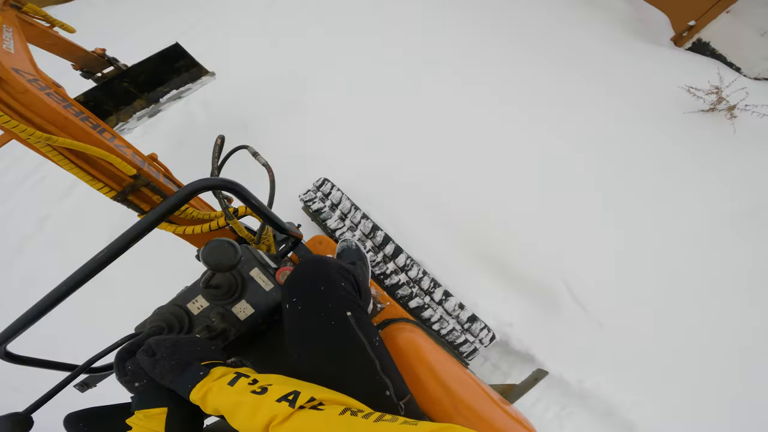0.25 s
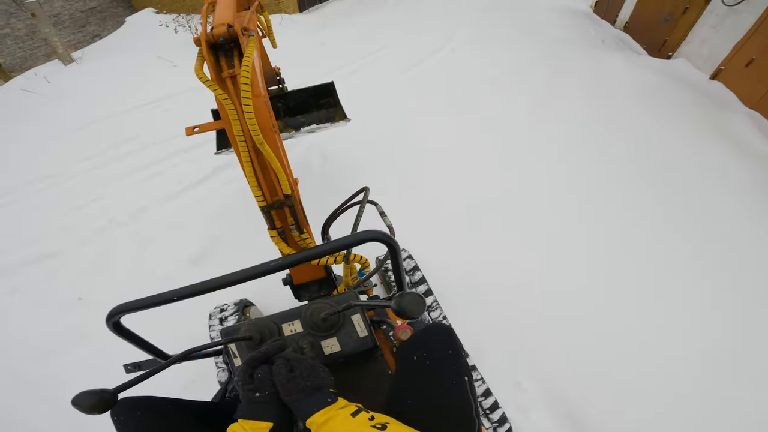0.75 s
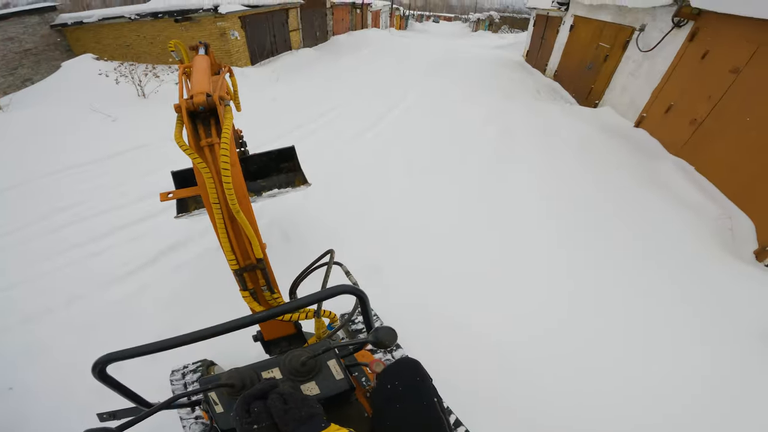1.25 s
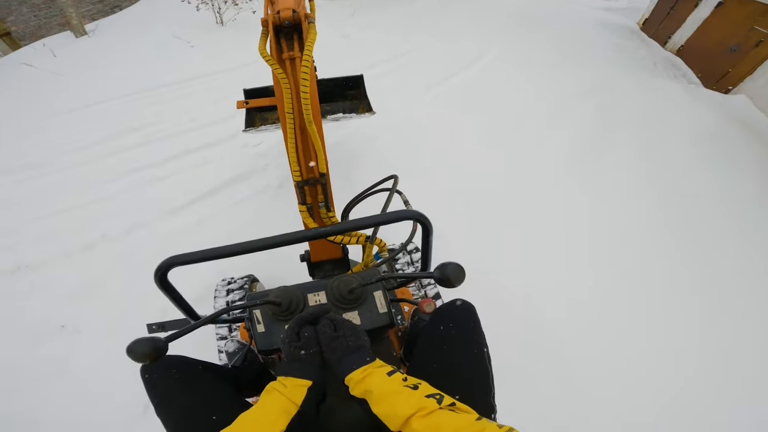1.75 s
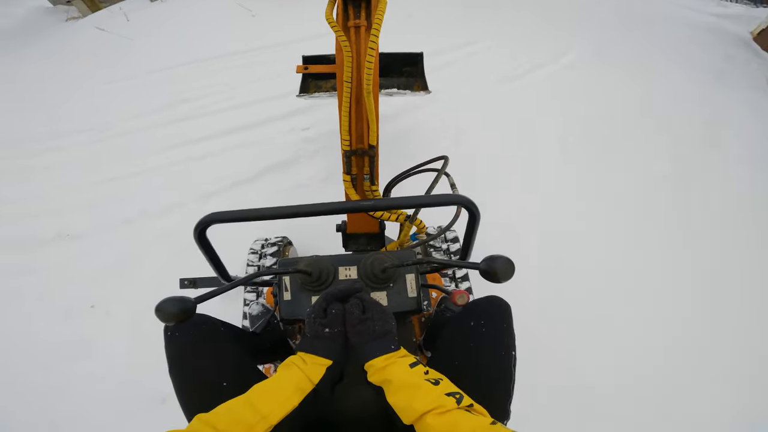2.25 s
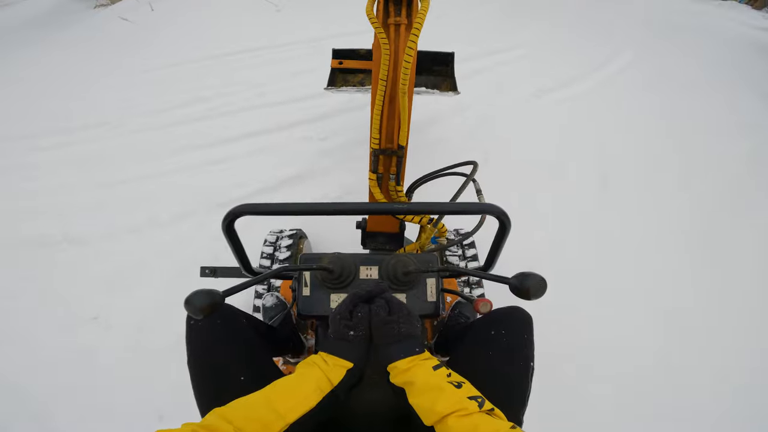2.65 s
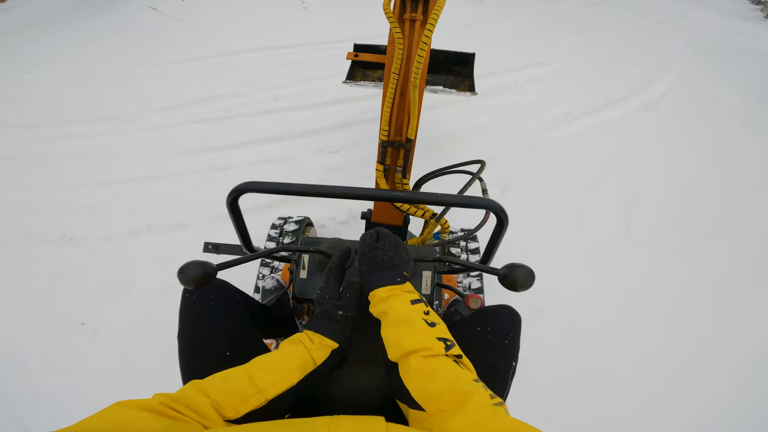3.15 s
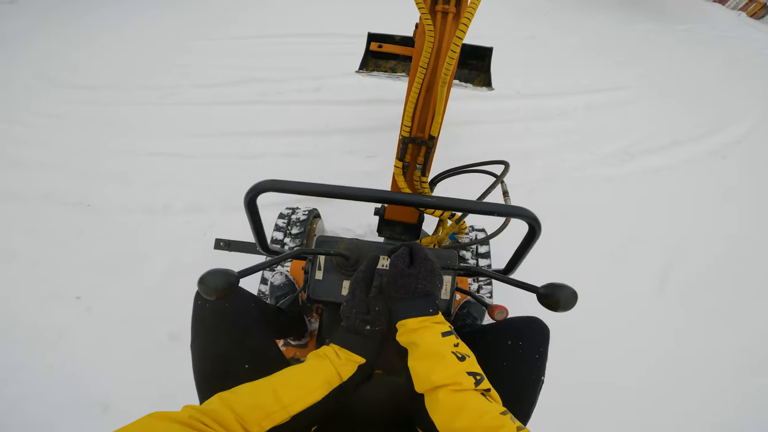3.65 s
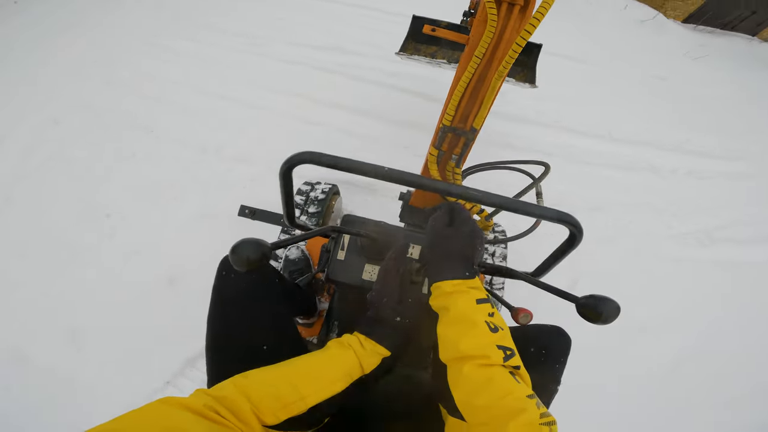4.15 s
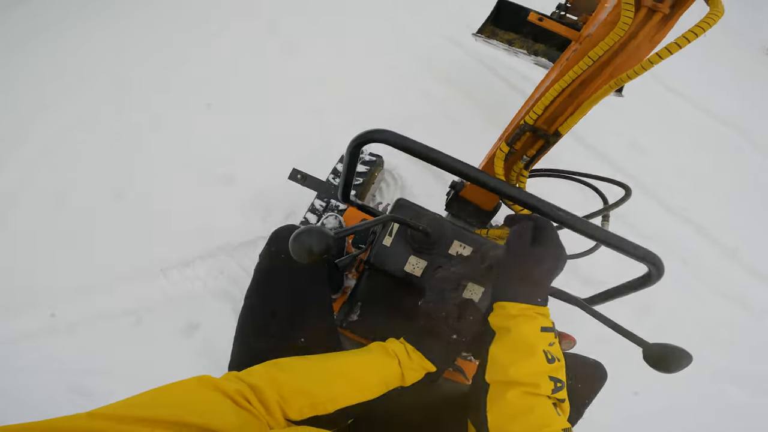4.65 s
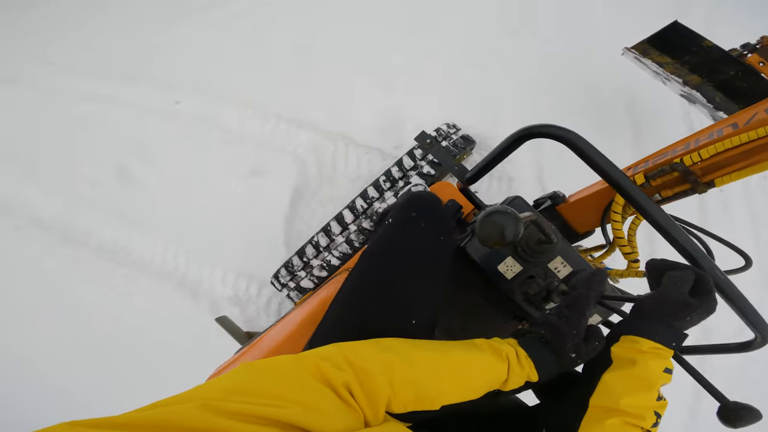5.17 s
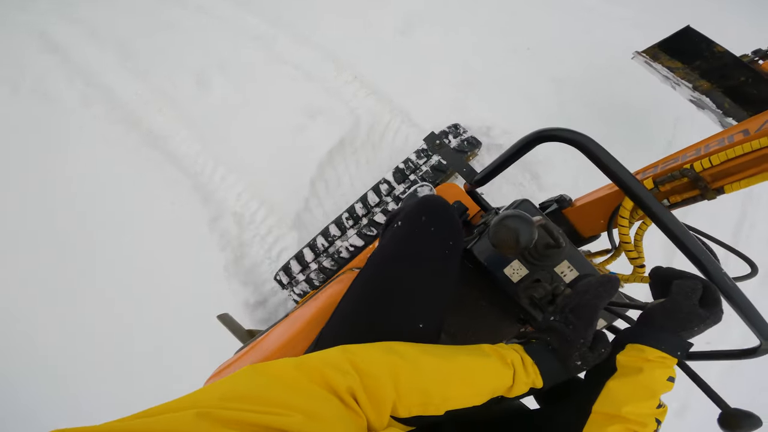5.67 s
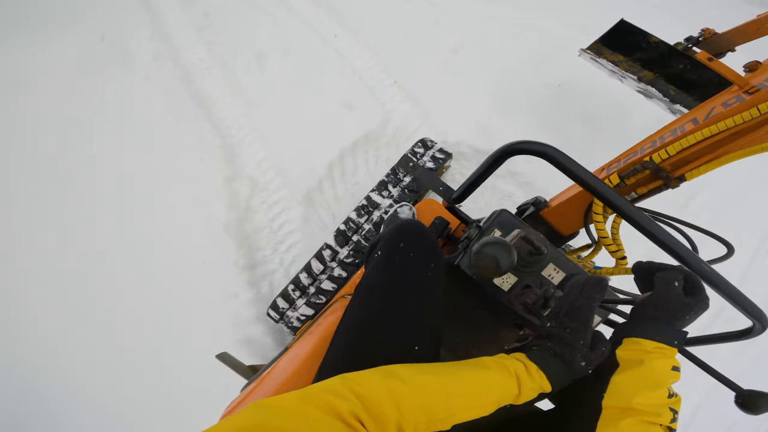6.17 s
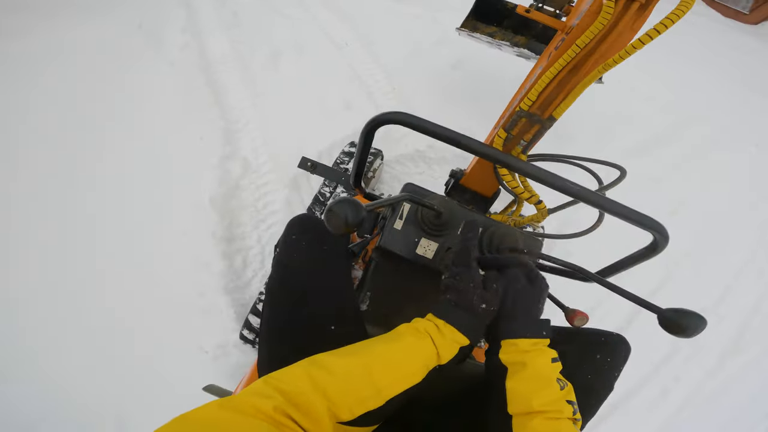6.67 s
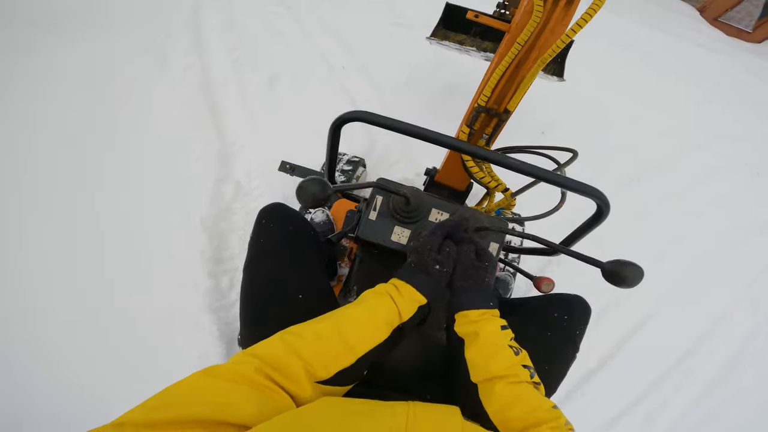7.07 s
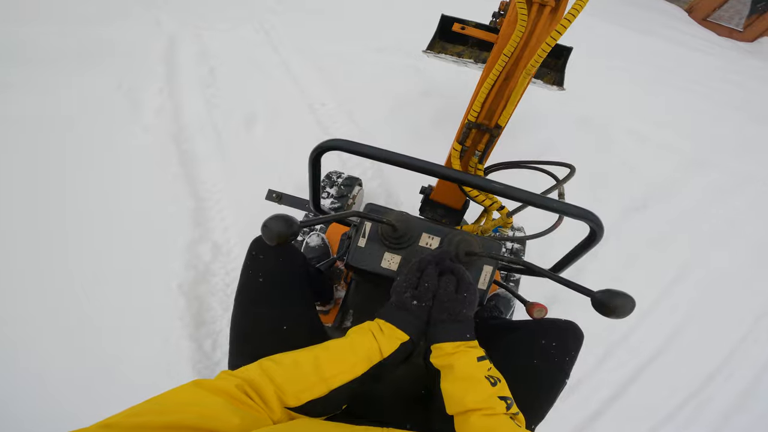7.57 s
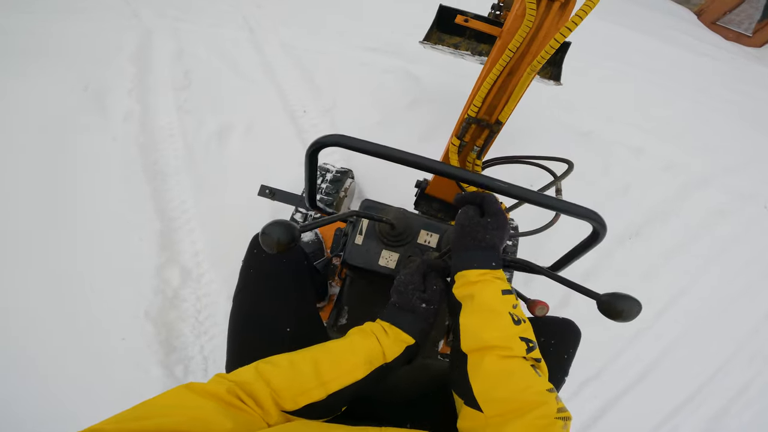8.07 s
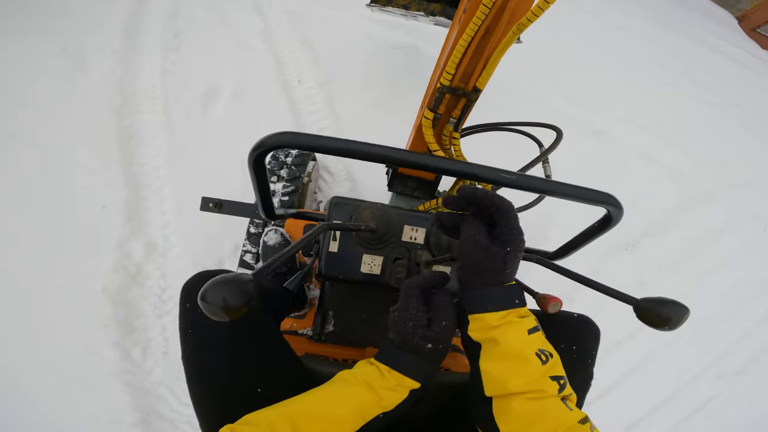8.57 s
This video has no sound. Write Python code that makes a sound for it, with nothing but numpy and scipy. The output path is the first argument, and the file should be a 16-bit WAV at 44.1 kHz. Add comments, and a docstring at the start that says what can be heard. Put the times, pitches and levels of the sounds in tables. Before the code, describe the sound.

Close, dry, open-air sound from a head-worn stereo microphone above a compact excavator. The diesel putters at about twenty-one beats a second, with ringing knock and broadband mechanical rustle. Pump whine and oil hiss fade early, followed by crisp clicks and a few duller clunks, busiest around two seconds and after seven. Between roughly five and seven seconds the engine colour changes, with sparser ticks; the pump rises slightly at the end.

```python
"""A one-cylinder diesel digger crawls over snow, heard by a camera on the driver's head.
Throughout, groups of engine overtones pulse once a cycle, the cylinder knocks and the casing rustles.
At first a pump whines and a valve hisses, fading over a second; levers and track links start to tick and clunk.
A soft swish passes at 3.25 s. From about 4.7 to 7 s the head is turned well aside, which shifts the colour.
Ticks and clunks go on, and the pump comes up again a little from about 8 s."""
import sys
import numpy as np
from scipy import signal
from scipy.fft import rfft, irfft
from scipy.io import wavfile
from scipy.ndimage import uniform_filter1d

SR = 44100
rng = np.random.default_rng(int(sys.argv[2]) if len(sys.argv) > 2 else 0)


def master(y):
    """Save y as 16-bit WAV."""
    cut = np.clip(np.atleast_2d(y).T, -1, 1)
    pcm = np.round(cut * 32767)  # scale
    wavfile.write(sys.argv[1], SR, pcm.astype(np.int16))


N = 388962
T = np.arange(N) / SR


def undb(db):
    """Turn decibels into a plain gain."""
    return np.exp(np.asarray(db) * np.log(10) / 20)


def level(x, db):
    """Scale to an rms level."""
    return x * undb(db) / np.sqrt(np.mean(x ** 2))


def curves(table):
    """Columns of a time table, one value a sample."""
    s, *columns = np.transpose(table)
    return [np.interp(T, s, c) for c in columns]


def along(table, hz):
    """A (pitch, value) table read on a log-frequency axis."""
    table_hz, values = np.transpose(table)
    return np.interp(np.log(hz), np.log(table_hz), values)


def band(x, lo_hz, hi_hz, order=2):
    """Keep only the sound between two frequencies."""
    edges = [lo_hz, min(hi_hz, SR / 2.1)]
    return signal.sosfilt(signal.butter(order, edges, "band", fs=SR, output="sos"), x)


def ring(x, hz, t60):
    """One decaying mode, like a struck bar; t60 is the time in s to fall by 60 dB."""
    r = np.exp(-np.log(1000) / (t60 * SR))
    w = 2 * np.pi * hz / SR
    return signal.lfilter([0, r * np.sin(w)], [1, -2 * r * np.cos(w), r * r], x)


def walk(rate):
    """Random levels held 1 / rate s and smoothed twice; spread near 1."""
    k = int(SR / rate)
    steps = np.repeat(rng.standard_normal(N // k + 1), k)
    return 1.48 * uniform_filter1d(uniform_filter1d(steps, k), k)[:N]


# firing rate as the tracks load and unload the engine: start_s [s], rate_hz [Hz]
FIRING_RATE = [(0, 21.61), (1.17, 21.56), (1.3, 21.65), (1.92, 21.57), (2.35, 21.76), (3.15, 21.61),
               (3.34, 22.1), (4.23, 22.01), (4.51, 20.93), (4.98, 21.32), (5.53, 21.18), (6.16, 21.22),
               (6.7, 21.31), (6.82, 21.82), (6.99, 21.17), (8.09, 21.5), (8.17, 21.85), (8.55, 20.93),
               (8.82, 21.15)]
START_CYCLE = .125  # place in the cycle at the start


def crank():
    """The firing rate, and the count of engine cycles so far that times everything on the engine."""
    hz, = curves(FIRING_RATE)
    return hz, START_CYCLE + np.cumsum(hz) / SR


# the driver's head: start_s [s], turned_aside [0-1], relative top_hiss_db [dB], relative casing_db [dB]
HEAD_TURNS = [(0, 0.48, -12.5, 0.5), (.5, 0.12, -10, -1.5), (1, 0.28, -17.5, 0.5), (1.4, 0.15, -15, -2),
              (2.1, 0.1, -8.5, 0), (3, 0, -2, 0), (4, 0.12, -7, -1), (4.3, 0.08, 5, 0),
              (4.7, 0.73, 13.5, -1), (5.2, 0.93, 2.5, 0), (6, 0.84, -2, 1.5), (6.6, 0.88, 5.5, 0),
              (7, 0.6, 8, 0), (7.6, 0.37, -6, -0.5), (8.2, 0.01, 3, -0.5), (8.5, 0.6, 11.5, 0),
              (8.82, 0.1, 11, 2.5)]


def head():
    """How far the head is turned, with the changes in top hiss and casing noise."""
    turn, top_db, casing_db = curves(HEAD_TURNS)
    return np.clip(turn, 0, 1), top_db, casing_db


def turned(turn, ahead_db, aside_db):
    """Gain that slides in dB from facing ahead to turned aside."""
    return undb((1 - turn) * ahead_db + turn * aside_db)


# overtones facing ahead: multiple [of the firing rate], relative rms level_db [dB]
AHEAD_OVERTONES = [(1, -33), (2, -38), (3, -19.5), (4, -25.5), (5, -24), (6, -35), (7, -17.5), (8, -17),
                   (9, -29.5), (10, -52), (11, -30), (12, -36.5), (13, -35), (14, -43), (15, -30.5),
                   (16, -38), (17, -40), (18, -40), (19, -46), (20, -48), (21, -44), (22, -43), (23, -46),
                   (24, -42), (25, -49), (26, -56), (27, -57), (28, -48), (29, -49), (30, -46), (31, -51),
                   (32, -52), (33, -49), (34, -56), (35, -65), (36, -58)]
# overtones turned aside: multiple [of the firing rate], relative rms level_db [dB]
ASIDE_OVERTONES = [(1, -32), (2, -37), (3, -19), (4, -23.5), (5, -23), (6, -34), (7, -19), (8, -19.5),
                   (9, -28.5), (10, -50), (11, -28), (12, -49.5), (13, -35), (14, -47), (15, -31.5),
                   (16, -47), (17, -32.5), (18, -37.5), (19, -53), (20, -38), (21, -45), (22, -48),
                   (23, -54), (24, -39), (25, -44), (26, -49), (27, -61), (28, -37), (29, -49), (30, -49),
                   (31, -45), (32, -36.5), (33, -47), (34, -45), (35, -52), (36, -61)]
# groups of engine overtones, low to high, each with its own place and shape in the cycle:
# first_multiple, last_multiple [of the firing rate], place_ahead [cycles], place_aside [cycles],
# shape [1 rings after its pulse, -1 swells up to it]
OVERTONE_GROUPS = [(1, 2, .804, .796, 1), (3, 5, .96, .97, 1), (6, 10, .216, .222, -1),
                   (11, 13, .726, .666, -1), (14, 18, .422, .438, 1), (19, 25, .814, .816, -1),
                   (26, 36, .732, .4, 1)]
WAVER_DB = (.3, 0.16, 0.16, 1.3, 1.0, 2.2, 0.68)  # one for each group
FIRING_JITTER_CYCLES = .001  # each firing a little early or late
PULSES_DB, LOAD_DB_PER_HZ, GOVERNED_HZ = -2.5, 0.26, 21.5  # louder as load drags the rate down


def group_wave(orders, first, last, place, ring_or_swell, cycle, size=65536):
    """One overtone group: a pulse with the shortest ring its overtones allow, once a cycle."""
    k = np.arange(65)
    overtone_gain = undb(np.array(orders)[np.clip(k, first, last) - 1, 1])
    # folding the cepstrum gathers the energy as early as it can be
    cepstrum = irfft(np.log(overtone_gain))
    log_gain = rfft(cepstrum * np.r_[1, np.full(63, 2), 1, np.zeros(63)])
    phase = ring_or_swell * log_gain.imag - 2 * np.pi * k * place
    lines = np.exp(log_gain.real + 1j * phase) * ((k >= first) & (k <= last))
    wave = irfft(lines, size) * size / np.sqrt(2)
    return wave[(cycle % 1 * size).astype(int)]


def pulses(hz, cycle, turn):
    """The engine pushes the air once a cycle: groups of overtones, each wavering in level."""
    out = 0
    cycle = cycle + FIRING_JITTER_CYCLES * walk(22)
    for (first, last, ahead, aside, shape), waver_db in zip(OVERTONE_GROUPS, WAVER_DB):
        front = group_wave(AHEAD_OVERTONES, first, last, ahead, shape, cycle)
        side = group_wave(ASIDE_OVERTONES, first, last, aside, shape, cycle)
        out = out + ((1 - turn) * front + turn * side) * undb(waver_db * walk(12))
    return out * undb(PULSES_DB + LOAD_DB_PER_HZ * (GOVERNED_HZ - hz))


# combustion, then valve gear seating: later [cycles after the knock],
# ahead_db, aside_db [dB, weighted by 1.5 - turn and by turn, then added]
BLOWS_IN_CYCLE = [(-.005, -2, -2), (.037, -14, 0), (0.1, -9, -3), (.17, -13.5, -16), (.265, -6.5, -14),
                  (.46, -12, -10), (0.715, -9, -18), (.83, -21, -11)]
# cylinder head modes: pitch_hz [Hz], t60_s [s],
# ahead_db, aside_db [dB, weighted by 2 - turn and by turn, then added]
CYLINDER_HEAD_MODES = [(620, 0.019, -7, -3), (860, 0.008, -13, -13), (920, 0.097, -2.5, 5.5),
                       (966, 0.057, 9, 9), (1001, 0.084, 3.5, 14), (1062, 0.099, -2.5, 9),
                       (1138, 0.047, 12.5, -11), (1190, .06, -1.5, 4.5), (1253, 0.054, 6.5, 0.5),
                       (1360, 0.012, -10.5, -7)]
# overall change with the head: ahead_db [dB], aside_db [dB]
KNOCK_TURN = (-2, 0.5)
KNOCK_PLACE = .53  # cycles
KNOCK_BASE_DB, KNOCK_SPREAD_DB = -38.5, 1.8  # rms before the change with the head; soft to hard


def knock(cycle, turn):
    """A run of blows rings the cylinder head in every cycle, each early or late, soft or hard."""
    force = 0
    for later, ahead_db, aside_db in BLOWS_IN_CYCLE:
        at = np.flatnonzero(np.diff(np.floor(cycle - KNOCK_PLACE - later)))
        chance = rng.standard_normal((len(at), 2))
        shift = (2 * chance[:, 0]).astype(int)  # samples early or late
        blows = np.zeros(N)
        blows[np.clip(at + shift, 0, N - 1)] = undb(KNOCK_SPREAD_DB * chance[:, 1])
        force = force + undb((1.5 - turn) * ahead_db + turn * aside_db) * blows
    force = uniform_filter1d(force, size=16)  # the pressure rise is blunt
    rung = sum(undb((2 - turn) * ahead_db + turn * aside_db) * ring(force, hz, t60)
               for hz, t60, ahead_db, aside_db in CYLINDER_HEAD_MODES)
    return level(rung, KNOCK_BASE_DB) * turned(turn, *KNOCK_TURN)


# casing noise colour: pitch_hz [Hz], relative level_db [dB per Hz]
CASING_COLOUR = [(18, -38), (30, -18), (64, -18.5), (110, -24), (167, -13.5), (216, -17), (337, -17),
                 (437, -18), (580, -20.5), (800, -25), (953, -24), (1350, -29.5), (2030, -34), (2920, -34),
                 (5300, -40), (12200, -64), (15000, -105)]
# valves and injector stir the noise: place [cycles], length [cycles], low_db [dB at 500 Hz], high_db [dB at 8 kHz]
VALVE_STIRS = [(.09, .025, 0, 3), (.36, 0.06, -1.5, 2), (.62, 0.08, 0, 3), (.85, 0.12, -5, -.5)]
CASING_BASE_DB = -35.8  # rms before the changes with the head


def casing(cycle, top_db):
    """Third-octave bands of metal noise, stirred by the valves; tiny rattles pepper the middle bands."""
    out, swell = 0, walk(2.85)
    rattles = (rng.random(N) < 60 / SR) * rng.exponential(130.0, N)
    grains = np.sqrt(1 + uniform_filter1d(rattles, 160))
    stirs = []
    for place, length, _, _ in VALVE_STIRS:
        distance = (cycle - place + .5) % 1 - .5
        stirs.append(np.exp(-.5 * (distance / length) ** 2))
    for hz in 32 * 2 ** np.arange(0, 9, 1 / 3):
        stir_db = sum(along([(500, low_db), (8000, high_db)], hz) * stir
                      for stir, (_, _, low_db, high_db) in zip(stirs, VALVE_STIRS))
        top_share = np.clip(np.log2(hz / 6500) / 2.5, 0, 1)
        db = along(CASING_COLOUR, hz) + stir_db + 0.49 * swell + 0.78 * walk(14) + top_share * top_db
        pepper = grains ** along([(600, 0.21), (3000, 0.54), (9000, 0.075)], hz)
        noise = rng.standard_normal(N) * pepper
        out = out + undb(db) * band(noise, hz * 2 ** (-1 / 6), hz * 2 ** (1 / 6))
    return level(out, CASING_BASE_DB)


# cover panels: pitch_hz [Hz], t60_s [s], relative ahead_db [dB], relative aside_db [dB]
PANEL_MODES = [(678, 0.085, -55, -46.5), (965, 0.012, -53, -59.5), (1190, 0.031, -50.5, -43),
               (1737, 0.022, -55, -49), (2470, 0.013, -76, -58.5), (2820, 0.0065, -56, -52.5),
               (3580, 0.026, -70, -58), (4330, .09, -64, -62), (7300, .05, -81, -76.5)]


def panels(cycle, turn):
    """Cover panels hum: noise in narrow modes, fluttering with the firing."""
    flutter = undb(2.5 * np.cos(2 * np.pi * (cycle - .55)))
    out = 0
    for hz, t60, ahead_db, aside_db in PANEL_MODES:
        hum = level(ring(flutter * rng.standard_normal(N), hz, t60), 0)
        out = out + hum * turned(turn, ahead_db, aside_db) * undb(0.63 * walk(1.7))
    return out


# change of casing and panels with the head: ahead_db [dB], aside_db [dB]
CASING_TURN = (2.27, 2.5)


def engine_noise(cycle, turn, top_db, casing_db):
    """Casing and panel noise together, coloured by the turning head."""
    return (casing(cycle, top_db) + panels(cycle, turn)) * turned(turn, *CASING_TURN) * undb(casing_db)


# pump while the cab swings: start_s [s], relative whine_db [dB], hiss_db [dB, before its swing in each cycle]
PUMP_LEVELS = [(0, -38, -45), (.13, -36.5, -39), (.22, -40, -49), (.36, -38, -37.5), (.48, -38, -39.5),
               (.65, -41, -47.5), (.9, -45, -50), (1.15, -49, -61), (4.3, -66, -68.5), (4.6, -55, -74),
               (6.7, -59, -74), (8.2, -46, -65), (8.82, -44, -70)]
# gear-tooth tones: multiple [of the firing rate],
# ahead_db, aside_db [dB, weighted by 1.5 - turn and by turn, then added], follows [1 follows whine_db, 0 not]
PUMP_TONES = [(20, 0, -3, 1), (28, 0, 0, 1), (47, -60, -47, 0), (56, -54, -44.5, 0)]
# oil through a control valve: pitch_hz [Hz], t60_s [s]
VALVE_MODE = (1075, 0.034)


def pump(cycle, turn):
    """Gear teeth locked to the crank whine, and oil hisses through a valve while the cab swings."""
    whine_db, hiss_db = curves(PUMP_LEVELS)
    swing_db = 4.4 * np.cos(2 * np.pi * (cycle - .68))
    out = level(ring(rng.standard_normal(N), *VALVE_MODE), 0) * undb(hiss_db + swing_db)
    for multiple, ahead_db, aside_db, follows in PUMP_TONES:
        db = (1.5 - turn) * ahead_db + turn * aside_db + follows * whine_db + 2.2 * walk(25)
        out = out + np.sqrt(2) * undb(db) * np.sin(2 * np.pi * multiple * cycle)
    return out


def bursts(s, db, t60, crack_db, crack_s):
    """Loose metal chatters: a sharp crack and a dying run of small bounces, as noise."""
    out = np.zeros(N)
    for at, gain, decay in zip((s * SR).astype(int), undb(db), t60):
        n = np.arange(min(2200, N - at))  # the chatter stops after 2200 samples
        bounces = np.exp(-np.log(1000) * n / SR / max(decay, .01))
        crack = undb(crack_db) * np.exp(-n / SR / crack_s)
        onset = np.minimum(n / 12, 1)
        out[at + n] += gain * rng.standard_normal(2200)[n] * (bounces + crack) * onset
    return out


STRAY_PER_S = 1.5  # faint ticks at random moments
STRAY_DB, STRAY_SPREAD_DB, STRAY_TREBLE_DB = -34.5, 1, -11
SHAKE_PLACE = .34  # cycles
SHAKE_AHEAD_DB, SHAKE_ASIDE_DB, SHAKE_TREBLE_DB = -58.5, -34, -3.5


def faint_ticks(cycle, turn):
    """Extra rows of time, level and treble share: stray ticks, and one shake in every cycle."""
    count = int(STRAY_PER_S * N / SR)
    stray_s = rng.random(count) * (N - 1) / SR
    stray_db = STRAY_DB + STRAY_SPREAD_DB * rng.standard_normal(count)
    stray = np.c_[stray_s, stray_db, np.full(count, STRAY_TREBLE_DB)]
    at = np.flatnonzero(np.diff(np.floor(cycle - SHAKE_PLACE)))
    shake_db = (1 - turn[at]) * SHAKE_AHEAD_DB + turn[at] * SHAKE_ASIDE_DB
    return np.r_[stray, np.c_[at / SR, shake_db, np.full(len(at), SHAKE_TREBLE_DB)]]


# levers and track links: start_s [s], relative level_db [dB], treble_db [dB, against level_db]
TICK_TIMES = [(0.3472, -25, -13), (0.618, -27.5, -15), (0.7592, -24, -20), (0.7941, -38, -16),
              (0.8091, -13, -27), (0.9488, -14.5, -25), (1.0376, -22, -18), (1.0865, -14, -15),
              (1.1648, -28.5, -16), (1.3433, -35, -20), (1.3897, -37, -20), (1.4277, -29, -21),
              (1.4678, -18.5, -16), (1.6248, -26.5, -4), (1.7759, -24.5, -8), (1.9161, -19, -9),
              (1.9679, -31, -20), (2.0378, -29, 1), (2.0553, -13, -9), (2.1051, -31, -22),
              (2.179, -20, -13), (2.1935, -15.5, -13), (2.2488, -17.5, -23), (2.2644, -20.5, -16),
              (2.3381, -28, -18), (2.6788, -32, -20), (2.7232, -40, -13), (2.8125, -29, -21),
              (2.8864, -29, -4), (2.9577, -28.5, -23), (3.0286, -32.5, 2), (3.1038, -32, -20),
              (3.1747, -28, 1.5), (3.2461, -29, -4), (3.2874, -42, 9), (3.3813, -22, -21),
              (3.4057, -20, -21), (3.4386, -22.5, -28), (3.5254, -21.5, -24), (3.5459, -22, -21),
              (3.5683, -23, -25), (3.6007, -33, -20), (3.706, -27, -16), (4.0407, -30, -19),
              (4.138, -32, -17), (4.383, -26.5, -26), (4.5221, -39, -20), (4.7229, -35, 1),
              (4.7591, -24, -20), (5.0215, -29, -14), (5.1248, -32, -18), (5.1896, -24, -18),
              (5.3592, -36, -14), (5.4076, -30, -15), (5.471, -30, -8), (5.5149, -31, -15),
              (6.0746, -21, -8), (6.1614, -28.5, -16), (6.3994, -33, -18), (6.5171, -23.5, -19),
              (6.5375, -29, -18), (6.81, -26, -21), (6.8958, -25, -9), (6.9331, -29.5, -17),
              (7.037, -23.5, -7), (7.0789, -21, -21), (7.1105, -37, -1), (7.1581, -26, -20),
              (7.1841, -19.5, -11), (7.2754, -30, -5), (7.3168, -21.5, -21), (7.449, -29, -16),
              (7.4894, -17, -30), (7.5328, -38, -12), (7.5533, -23.5, -5), (7.6067, -25.5, -17),
              (7.6386, -21.5, -14), (7.7638, -28, -16), (7.8141, -32, -16), (8.1035, -21, -19),
              (8.1275, -23, -15), (8.2557, -23, -16), (8.309, -37, -18), (8.3939, -18, -21),
              (8.417, -23.5, -15), (8.5685, -22, -11), (8.6492, -34, -12), (8.7311, -24, -16)]
# modes of the ticking metal: pitch_hz [Hz], t60_s [s], relative level_db [dB]
TICKING_MODES = [(2453, 0.028, 0.5), (3190, 0.033, -6.5), (3465, 0.013, 0.5), (3736, 0.011, 2),
                 (4240, 0.0098, 1), (4760, 0.011, -3.5), (5806, 0.019, -3.5)]
# side of the ticks: start_s [s], left_minus_right_db [dB]
TICK_SIDES = [(0, 5.5), (3, 2), (5, -4), (7, -2.5), (8.82, -2)]
TICK_T60_S, TICK_TREBLE_T60_S = 0.059, 0.029
TICK_STRIKE_DB = 15  # first contact over the chatter


def ticks(cycle, turn):
    """Levers and track links strike: a broad crack, faint modes and a share of bright chatter."""
    s, db, treble_db = np.r_[TICK_TIMES, faint_ticks(cycle, turn)].T
    strikes = np.bincount((s * SR).astype(int), undb(db + TICK_STRIKE_DB), N)
    chatter = bursts(s, db, np.full(len(s), TICK_T60_S), crack_db=-2.5, crack_s=0.0013)
    blows = band(strikes + chatter, 1930, 5970, order=3)
    rung = sum(undb(mode_db) * ring(blows, hz, t60) for hz, t60, mode_db in TICKING_MODES)
    body = undb(-32.5) * rung + undb(-6.5) * blows
    treble_t60 = np.full(len(s), TICK_TREBLE_T60_S)
    bright = band(bursts(s, db + treble_db, treble_t60, crack_db=-12.0, crack_s=0.00035), 4600, 8400, order=3)
    pan, = curves(TICK_SIDES)
    return body * undb(np.array([pan, -pan]) / 2) + bright


# heavier frame parts: start_s [s], relative level_db [dB], chatter t60_s [s],
# tilt_db [dB per octave towards the upper modes], favoured_hz [Hz, mode that is lifted]
CLUNK_TIMES = [(0.9418, -19.5, 0.057, -9, 960), (1.624, -30, 0.088, 0, 820), (1.916, -28.5, 0.08, 2, 1812),
               (2.041, -21, 0.048, -7, 1812), (2.06, -26.5, 0.11, -3.5, 820), (2.183, -15, 0.03, -5, 1812),
               (2.886, -24.5, 0.027, -8, 820), (3.44, -17.5, 0.043, 1.5, 820), (6.076, -21.5, .03, 8, 2850),
               (6.078, -21, 0.029, 1, 1400), (7.162, -17.5, 0.086, 0.5, 820), (7.307, -27, 0.033, -1, 960),
               (7.551, -17.5, 0.075, -1, 1535), (7.727, -22, 0.067, -2, 1535),
               (7.88, -22.5, 0.062, -1, 1535)]
# frame modes: pitch_hz [Hz], t60_s [s], relative level_db [dB]
FRAME_MODES = [(815, 0.045, -3), (963, 0.02, -4.5), (1220, 0.02, -4), (1390, 0.035, -5), (1551, 0.03, -2),
               (1810, 0.022, -3.5), (2103, 0.025, -4.5), (2300, 0.015, -6.5), (2840, 0.03, -5.5)]
CLUNK_STRIKE_DB, CLUNK_CHATTER_DB = -15, -24.5  # first contact and chatter, as they drive the modes
CLUNK_FAVOUR_DB = 6.5  # lift of the mode nearest to the struck spot


def clunks():
    """Heavier parts of the frame thud lower: one contact rings the modes, chatter follows."""
    s, db, t60, tilt_db, favoured_hz = np.transpose(CLUNK_TIMES)
    blows = band(bursts(s, db, t60, crack_db=-15.5, crack_s=0.00062), 650, 2900)
    latest = np.maximum(np.searchsorted(s, T, side="right") - 1, 0)  # row of the latest clunk
    strikes = np.zeros(N)
    strikes[(s * SR).astype(int)] = undb(db + CLUNK_STRIKE_DB)
    force = strikes + undb(CLUNK_CHATTER_DB) * blows
    out = undb(-6) * blows
    for hz, mode_t60, mode_db in FRAME_MODES:
        favoured = np.abs(np.log2(hz / favoured_hz)) < .07
        lift_db = tilt_db * np.log2(hz / 1300) + CLUNK_FAVOUR_DB * favoured
        out = out + ring(force * undb(mode_db + lift_db)[latest], hz, mode_t60)
    return out


# a glove brushes a lever: middle_s [s], half_length_s [s], level_db [dB rms, before the fade in and out]
GLOVE_SWISH = (3.25, 0.034, -54)


def swish():
    """A glove brushes a lever: a short soft hiss of band-limited noise."""
    middle, half, db = GLOVE_SWISH
    hiss = level(band(rng.standard_normal(N), 6940, 9700), db)
    return hiss * np.exp(-.5 * ((T - middle) / half) ** 2)


# timing between the ports: pitch_hz [Hz], left_lead [radians]
PHASE_BETWEEN_PORTS = [(60, .05), (300, .14), (1000, .3), (3000, .62), (5250, .3), (12000, -.1)]
# level between the ports: pitch_hz [Hz], left_minus_right_db [dB]
BALANCE_BETWEEN_PORTS = [(60, -.6), (130, .2), (300, .5), (1000, .9), (2000, .4), (4000, .2), (8000, -.5),
                         (12000, 0)]
# casing noise unlike at the two ports: pitch_hz [Hz], level_db [dB, against the noise itself]
NOISE_APART = [(60, -38), (290, -14.5), (630, -14.5), (1380, -11.5), (3030, -11), (6640, -12),
               (14000, -8.5)]


def two_ports(near, noise, hz):
    """Two microphone ports: part of the casing noise reaches each port by its own path."""
    f = np.maximum(np.fft.rfftfreq(N, 1 / SR), 1)
    half = undb(along(BALANCE_BETWEEN_PORTS, f) / 2) * np.exp(.5j * along(PHASE_BETWEEN_PORTS, f))
    # the same noise one firing later is unrelated but keeps the beat
    apart = rfft(np.roll(noise, int(SR / np.mean(hz)))) * undb(along(NOISE_APART, f))
    return irfft(rfft(near) * np.array([half, 1 / half]) + np.array([apart, -apart]), N)


def scene():
    """Engine, casing noise, pump, ticks, clunks and swish together at two microphone ports."""
    hz, cycle = crank()
    turn, top_db, casing_db = head()
    engine = pulses(hz, cycle, turn) + knock(cycle, turn) + pump(cycle, turn)
    noise = engine_noise(cycle, turn, top_db, casing_db)
    near = engine + noise + ticks(cycle, turn) + clunks() + swish()
    return two_ports(near, noise, hz)


TOP_HZ = 15100


def record(dry):
    """The camera cuts the top: a steep low-pass filter."""
    return signal.sosfilt(signal.ellip(8, .2, 70, TOP_HZ, fs=SR, output="sos"), dry)


dry = scene()
out = record(dry)
master(out)
```